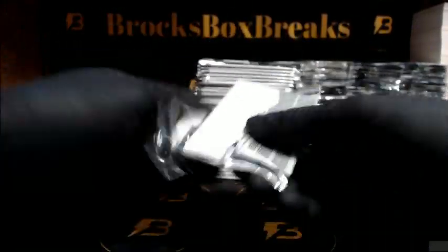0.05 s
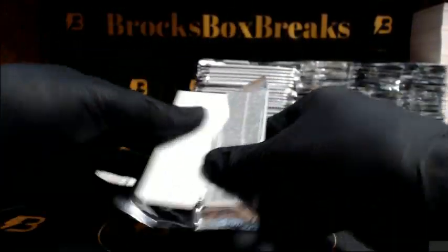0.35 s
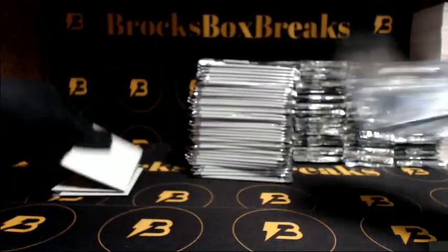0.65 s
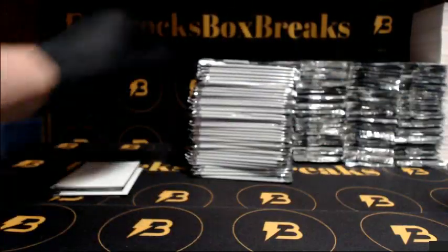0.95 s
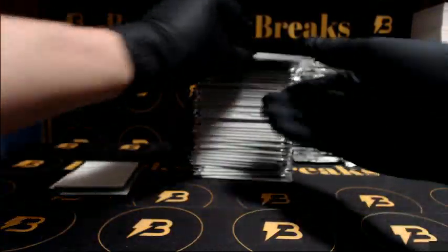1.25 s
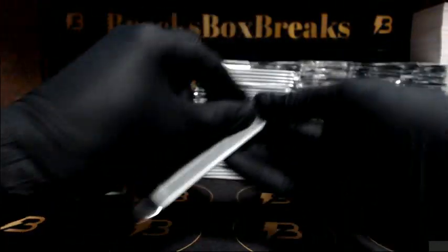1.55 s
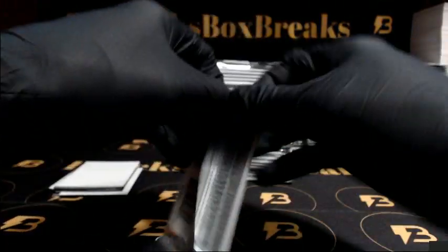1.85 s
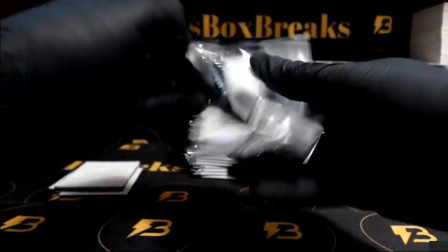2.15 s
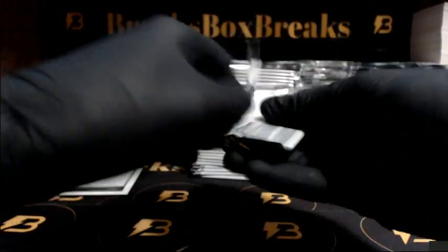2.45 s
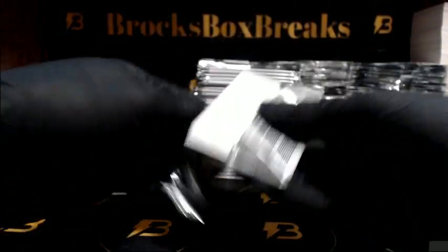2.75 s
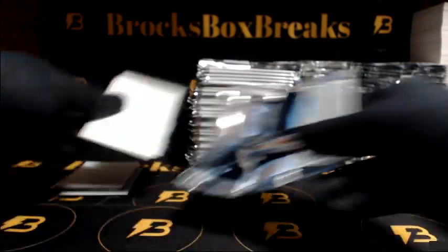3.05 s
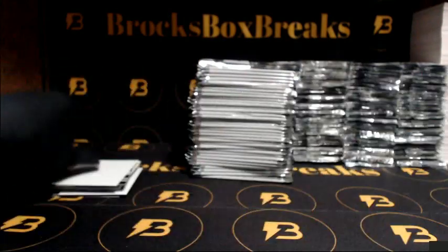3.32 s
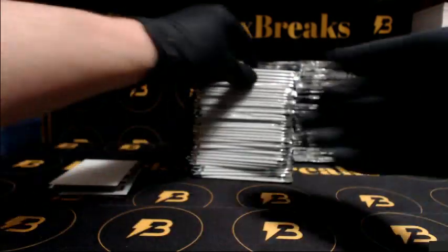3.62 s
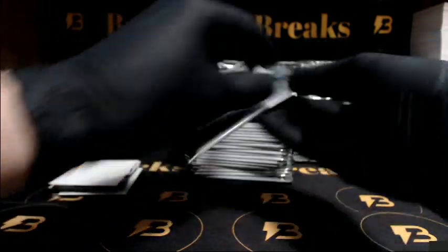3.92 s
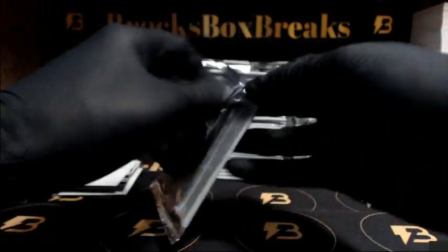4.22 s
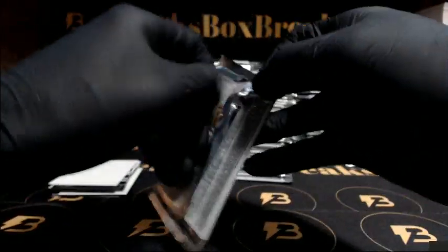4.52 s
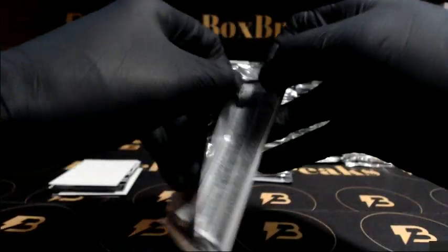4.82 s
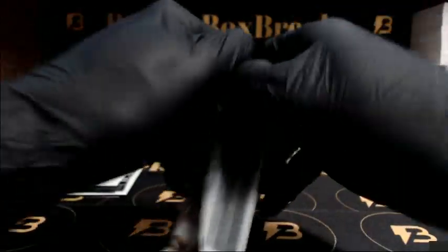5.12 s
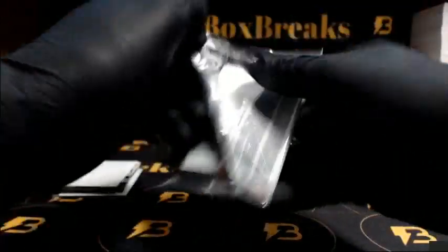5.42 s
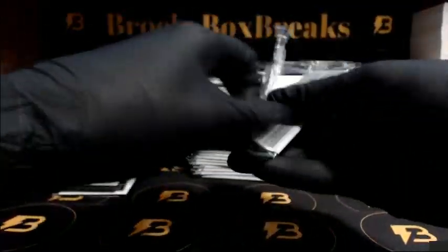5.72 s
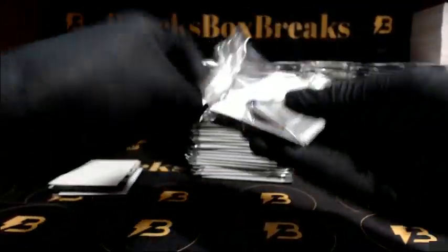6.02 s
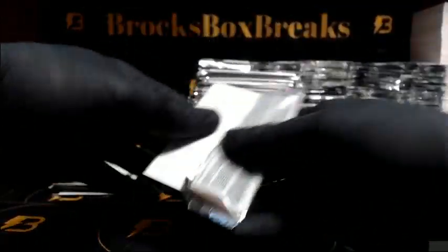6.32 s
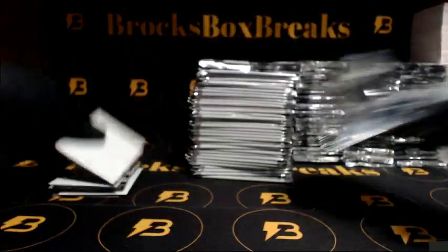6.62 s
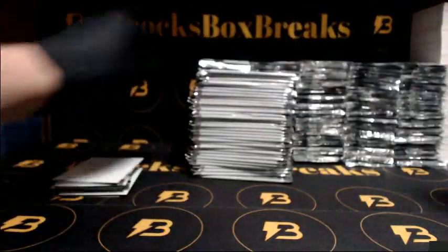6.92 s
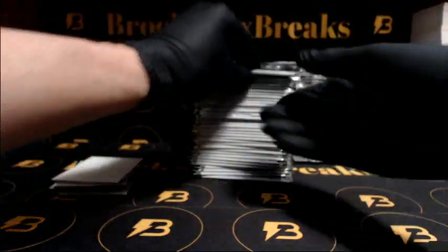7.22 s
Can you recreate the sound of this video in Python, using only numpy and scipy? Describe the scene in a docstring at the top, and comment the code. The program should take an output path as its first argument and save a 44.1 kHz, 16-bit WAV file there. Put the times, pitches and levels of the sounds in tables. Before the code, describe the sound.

In a small room, foil card packs are opened one after another right by the microphone. Bright crinkling and sharp snaps come in clusters, with two quick rips as the sealed seams give way. Three times the crackle eases and a stack of cards thumps softly onto a padded table. Light rustling starts again at the end, with a very faint hum and hiss underneath.

```python
"""Opening foil packs of trading cards

Gloved hands tear open foil packs, close to a microphone in a small room. Every squeeze, pull and rip
makes tiny patches of foil flip (the crinkle), while bigger creases give single, louder snaps.
Each stack of cards is then dropped on a padded table, which thumps.
The handling shakes the microphone stand, over faint hum and hiss."""
import sys
import numpy as np
from scipy import signal
from scipy.fft import rfft, irfft, next_fast_len
from scipy.io import wavfile
from scipy.ndimage import uniform_filter1d

SR = 44100
rng = np.random.default_rng(int(sys.argv[2]) if len(sys.argv) > 2 else 0)


def bounce(signal):
    """Save signal as a 16-bit WAV file at the path given by the first command-line argument."""
    frames = np.transpose(np.atleast_2d(signal))
    limited = np.clip(frames, -1, 1)
    pcm = np.round(limited * 32767).astype(np.int16)
    wavfile.write(sys.argv[1], SR, pcm)


N = 328986

# Levels compare rows within a table. A t60 is the time a sound takes to fade by 60 dB.
# how hard the microphone stand shakes: time_s, level_db
STAND_SHAKE = [(0.0, -77.5), (1.76, -82), (1.89, -67.5), (3.84, -79.5), (4.67, -64.5), (4.92, -87),
               (5.17, -51), (5.42, -75), (5.75, -65), (6.1, -78), (7.46, -76.5)]
# the tone of the stand's rumble: frequency_hz, level_db
STAND_SPECTRUM = [(8, -14), (19, 4), (33, -17), (55, -21.5), (90, -24.5), (140, -38.5), (220, -55.5),
                  (600, -82)]
# a fan motor's hum beating against the mains hum: pitch_hz, level_db
HUM_TONES = [(57, -82), (60, -83), (119.5, -98.5)]
# the tone of the steady room noise: frequency_hz, level_db
HISS_SPECTRUM = [(30, -14.5), (60, -12), (130, -8), (200, -27), (450, -25), (1100, -39), (7000, -36),
                 (16000, -31.5)]
# the tone of the foil: frequency_hz, level_db
FOIL_SPECTRUM = [(100, -33.5), (180, -10.5), (260, -11), (340, -11.5), (600, -6.5), (1100, -4), (1600, -1),
                 (2400, -3), (3700, -1), (5600, -0.5), (9500, 0.5), (12000, -1.5), (14000, -5),
                 (16000, -11)]
# a held pack rustles softly: start_s, hold_s, level_db, brightness_db_per_octave
HELD_RUSTLES = [(0, 0.33, -67, -1.5), (.33, 0.43, -73, -2.5), (1.15, 0.14, -76.5, -3),
                (1.33, 0.81, -61.5, 1), (2.22, 0.45, -60, -2), (2.86, 0.24, -73, -2), (3.8, 1.7, -70.5, 1),
                (5.1, 1.22, -64.5, -3.5), (6.32, 0.31, -71, -2.5), (6.96, 0.44, -75.5, -0.5)]
# each squeeze, pull or slide of the wrapper: start_s, hold_s, level_db, brightness_db_per_octave
HAND_STROKES = [(.027, 0.041, -51.5, 0), (.21, .075, -54, -2), (.575, 0.06, -66.5, -5.5),
                (.80, 0.032, -63, -.5), (1.0, 0.12, -73, -2.5), (1.22, 0.043, -65.5, 2),
                (1.33, 0.075, -56, 2.5), (1.44, 0.029, -41.5, 2.5), (1.51, 0.017, -49, 2),
                (1.58, 0.024, -55, -1.5), (1.70, 0.06, -44.5, .5), (1.89, 0.071, -55.5, 2),
                (1.97, 0.057, -47.5, 0), (2.05, 0.065, -60.5, -0.5), (2.27, 0.14, -42.5, 0.5),
                (2.385, .03, -39.5, -2.5), (2.44, 0.21, -50, -1), (2.735, 0.025, -55, -0.5),
                (2.785, 0.07, -52, -1), (3.06, 0.027, -54.5, -4.5), (3.46, 0.28, -71, -1.5),
                (3.575, 0.049, -65.5, -0.5), (3.873, 0.0082, -49, 1.5), (3.916, 0.021, -43.5, 3),
                (4.068, 0.0081, -52.5, 1.5), (4.195, .03, -46, 0), (4.28, 0.03, -49, 1),
                (4.548, 0.057, -44.5, 1.5), (4.66, 0.019, -59, 0), (4.78, .14, -58.5, 2.5),
                (4.835, 0.011, -46.5, -1), (4.97, .05, -64.5, -1.5), (5.19, 0.064, -46, -0.5),
                (5.335, 0.073, -50, -0.5), (5.52, 0.13, -45, 0.5), (5.66, 0.11, -38.5, -0.15),
                (5.80, 0.087, -50.5, -1), (5.89, 0.03, -44.5, -1), (5.99, 0.13, -55, -0.5),
                (6.225, 0.042, -48, -1.5), (6.56, 0.037, -60.5, -3.5), (6.96, 0.029, -69, -3),
                (7.06, 0.074, -68, -4), (7.145, 0.027, -60.5, 1.5), (7.28, 0.006, -67, -2.5),
                (7.405, 0.053, -50, 1)]
# the sealed seam rips open: start_s, hold_s, level_db, brightness_db_per_octave
SEAM_RIPS = [(1.798, 0.086, -42, 0), (5.083, .08, -38.5, 0.06)]
# big creases snap (body is the lower part, sparkle the top): start_s, level_db, body_db, sparkle_db
CREASE_SNAPS = [(.0715, -47, 17, 13), (0.1142, -52, 2, 1), (0.1388, -47.5, 9, -3), (0.2123, -48.5, 15, 9),
                (0.2555, -43, 3, 12), (0.2709, -42, -0.5, 0), (0.461, -49.5, 0.5, -3),
                (0.658, -51.5, -4, -3), (0.7298, -45.5, -3.5, -3), (0.8158, -54, 5, 2), (1.162, -52, 6, -4),
                (1.315, -48, -10, 4), (1.392, -46, -11, -2), (1.4634, -37.5, -9, -3.5),
                (1.514, -43, 3.5, -4), (1.5267, -46, -13, 10), (1.571, -43, -8, 4.5),
                (1.651, -41.5, -2.5, 2.5), (1.6895, -43.5, 1.5, 6), (1.7989, -30, 4, 3),
                (1.8738, -31.5, 2, .5), (1.969, -36.5, -5.5, -0.5), (1.9932, -36, 9, 6.5),
                (2.067, -41, -18, 1), (2.101, -40, 2, 4), (2.118, -43, -2.5, -1), (2.1837, -54, 2, -9),
                (2.2297, -47, -3, -7), (2.252, -45, -9, 10), (2.2865, -36.5, -7, -1.5),
                (2.326, -35, -2, -2), (2.3334, -34.5, 2, 4), (2.3856, -35, 14, 5.5),
                (2.4012, -28.5, 6, 1.5), (2.409, -30.5, -5, -4.5), (2.44, -37.5, 1, 4),
                (2.4798, -41.5, 8, 3), (2.5234, -44, 7, 13), (2.574, -39, 3, 2), (2.586, -37, 7, 7),
                (2.6117, -37.5, 3.5, 1.5), (2.7981, -40.5, 6.5, 3), (3.0727, -43.5, -5, 5),
                (3.1507, -44, 10, 0.5), (3.593, -52.5, -2, -3), (3.708, -50, 8, 2), (3.8342, -54, 5, 11),
                (3.881, -41.5, 11.5, 7.5), (3.917, -31.5, -12, 9), (4.0373, -54.5, 1, 9),
                (4.0636, -48, -8, 18), (4.126, -51, 0.5, 3.5), (4.1616, -48, 8, 10), (4.209, -40.5, 10, 9),
                (4.236, -44, 6.5, 10), (4.2822, -44, 8, 2), (4.3268, -45, -6, 12), (4.397, -55, -19, -13),
                (4.4792, -53.5, 12.5, -1), (4.5633, -35.5, -20, -2.5), (4.841, -41, 6.5, 6.5),
                (4.8943, -44, -22.5, 2), (4.9613, -56.5, 0, -1), (4.9834, -46.5, 4.5, 6.5),
                (5.0129, -47.5, 4, -0.5), (5.0627, -50, 6, -2), (5.0833, -25.5, -15, 4.5),
                (5.1062, -44, -10, -5), (5.1459, -31, 3, 3), (5.1578, -32.5, 2.5, 2),
                (5.207, -40, -3, 11.5), (5.2429, -37, -4, -7), (5.3923, -38, -15.5, 1.5),
                (5.4366, -42.5, -10, -6.5), (5.4836, -44.5, 2.5, 3.5), (5.516, -44, 4, -5),
                (5.5287, -36.5, -3, -3), (5.5486, -41.5, 3.5, 2), (5.5756, -36.5, -5, 0),
                (5.6074, -34.5, -1, 6), (5.673, -35, -13, 13), (5.751, -28, 9.5, 7.5),
                (5.7725, -31, -2, -8), (5.8052, -38, 4.5, 2), (5.8407, -40, 4.5, -3),
                (5.894, -36.5, 1, 9.5), (6.0458, -39, 4, -4), (6.0898, -42.5, 0.5, -4.5),
                (6.1376, -37.5, 3, -2.5), (6.253, -42.5, 9.5, 7), (6.2964, -43.5, 2, 4),
                (6.3862, -51.5, 7, -4), (6.4952, -49.5, 2.5, -11), (6.5413, -55.5, -15, -5),
                (6.6929, -53.5, 4, -8.5), (6.824, -55, -6.5, -4.5), (6.888, -64.5, 1.5, -2),
                (6.9478, -51, 8, -4), (6.9576, -46.5, 9, -7), (7.0715, -45, 6.5, 0.5),
                (7.449, -39.5, -21, 2)]
# soft bumps on the table as the cards are lowered: start_s, level_db
CARD_TOUCHES = [(0.487, -59), (3.008, -51.5), (6.472, -62)]
# a stack of cards lands: start_s, level_db, hardness_db_per_octave
CARD_DROPS = [(0.6003, -36.5, 0.5), (3.0809, -36, -4.5), (6.572, -46, 1.5)]
# the notes of the table with the card pile on it: pitch_hz, level_db, t60_s
TABLE_NOTES = [(143, -6, 0.097), (175, -5.5, 0.067), (224.5, -1, 0.056), (276, -5.5, 0.026),
               (380, -7, 0.049), (500, -14, 0.065), (705, -10.5, 0.029), (1000, -14, 0.029)]
# tugs on the pack that jolt the table: start_s, level_db, pitch_hz
PACK_TUGS = [(4.567, -55.5, 104), (5.085, -49, 85), (5.094, -58.5, 131)]
# hollow pops of larger panels of wrapper and card: start_s, level_db, pitch_hz
PANEL_POPS = [(1.8345, -40, 2100), (1.875, -39.5, 4200), (1.899, -43, 1910), (2.348, -41, 2980),
              (2.4002, -38, 2480), (2.4052, -43, 2200), (2.612, -43, 1590), (3.033, -57.5, 1340),
              (3.7085, -50, 1750), (4.397, -54, 4000), (5.0866, -33, 4000), (5.087, -37.5, 1270),
              (5.187, -39.5, 765), (5.351, -45, 3200), (5.659, -39.5, 3090), (5.759, -41, 705),
              (5.7716, -33, 1630), (6.1378, -47.5, 1290), (6.4958, -49, 1370)]
# how long the room echoes: frequency_hz, t60_s
ROOM_DECAY = [(150, .3), (1500, 0.24), (6000, 0.16), (15000, 0.064)]
# peaks and dips in tone from the table top and back wall: centre_hz, width_hz, gain_db
SURFACE_BANDS = [(718, 31, -4), (810, 39, -4.5), (1097, 56, -2.5), (1630, 91, -0.5), (1874, 760, -3),
                 (2200, 82, 2.5), (2490, 130, 3), (2770, 290, -1)]

TOP_HZ = 16050  # upper edge of the treble
RIP_EVENNESS = 0.76  # a seam gives way in more even steps than loose foil does (0-1)
LIGHT_DB, LIGHT_RANGE_DB = -56, 16  # below this level, over this range, flipping gives way to sliding
LIGHT_SLIDE_DB, LIGHT_FLIP_DB = 2.2, -5  # change in each under the lightest touch
TOUCH_HARDNESS = -5  # dB per octave
SETTLE_S, SETTLE_DB, SETTLE_HARDNESS = 0.026, -13, -3  # a stack's far edge lands later, weaker, softer
SWAY_HZ, SWAY_T60_S, SWAY_DB = 55.2, 0.44, -64  # each drop sets the microphone stand swaying


def amp(db):
    """Turn decibels into a number to multiply by."""
    return 10 ** (np.asarray(db) / 20)


def along(points, hz):
    """Read between (frequency, value) points on a log frequency scale."""
    frequencies, values = np.transpose(points)
    return np.interp(np.log(hz + 1), np.log(frequencies + 1), values)


def curves(rows):
    """Stretch each column after the time to one value per sample."""
    times, *columns = np.transpose(rows)
    return [np.interp(np.arange(N) / SR, times, column) for column in columns]


def filtered(x, response):
    """Scale each frequency in x by response(hz)."""
    size = next_fast_len(N + SR // 2)
    return irfft(rfft(x, size) * response(np.fft.rfftfreq(size, 1 / SR)), size)[:N]


def noise(spectrum):
    """Noise with the given tone and an average power of 1."""
    x = filtered(rng.standard_normal(N), lambda hz: amp(along(spectrum, hz)))
    return x / np.sqrt(np.mean(x ** 2) + 1e-20)


def add(track, start_s, sound):
    """Mix a sound into the track."""
    rest = track[max(0, round(start_s * SR)):][:len(sound)]
    rest += sound[:len(rest)]


def causal(gain_db):
    """Turn a gain curve into a filter that rings only after a hit (minimum phase)."""
    cepstrum = irfft(np.log(amp(gain_db) + 1e-6))
    half = len(cepstrum) // 2
    cepstrum[1:half] *= 2
    cepstrum[half + 1:] = 0
    return np.exp(rfft(cepstrum))


def ping(t, hz, t60, attack_s):
    """A pure tone that starts softly and dies away."""
    return np.sin(2 * np.pi * hz * t) * amp(-60 * t / t60) * (1 - np.exp(-t / attack_s))


def background():
    """The shaken stand rumbles, fan and mains hum, and the room hisses."""
    shake_db, = curves(STAND_SHAKE)
    t = np.arange(N) / SR
    hum = sum(amp(db) * np.sqrt(2) * np.sin(2 * np.pi * (hz * t + rng.random())) for hz, db in HUM_TONES)
    rumble = amp(shake_db + 2.0) * noise(STAND_SPECTRUM)
    return rumble + hum + amp(-79.5) * noise(HISS_SPECTRUM)


def moves(rows, t, swell_s, fade_s, sag_db=2):
    """Hand moves swell, sag a little and fade. Gives their total power, and power times brightness."""
    start, hold, db, brightness = np.transpose(rows)[:, :, None]
    shape = np.exp(np.minimum(t - start, 0) / swell_s - np.maximum(t - start - hold, 0) / fade_s)
    progress = np.clip((t - start) / hold - .5, -.5, .5)
    power = (shape * amp(db - sag_db * progress)) ** 2
    return np.array([power.sum(0), (brightness * power).sum(0)])


def handling(still_db=-86.5):
    """All hand moves together: the foil's level in dB, its brightness and the share that is ripping."""
    t = np.arange(0, N, 32) / SR
    rips = moves(SEAM_RIPS, t, swell_s=0.00089, fade_s=0.013)
    strokes = moves(HAND_STROKES, t, swell_s=.009, fade_s=.022)
    held = moves(HELD_RUSTLES, t, swell_s=.01, fade_s=.024)
    power, bright_power = rips + strokes + held
    power = power + amp(still_db) ** 2  # the wrappers lying at rest
    return curves(np.column_stack([t, 10 * np.log10(power), bright_power / power, rips[0] / power]))


def buckle(body_db, sparkle_db, crack_t60, ring_t60, ring_db, pop, uneven_db, size=2048, count=26):
    """One patch of foil flips: a pop, a short crack and a ring with its own tone. Total energy is 1."""
    t, hz = np.arange(size) / SR, np.fft.rfftfreq(size, 1 / SR)
    flex = rng.standard_normal(size) * (amp(-60 * t / crack_t60) + amp(ring_db - 60 * t / ring_t60))
    flex[0] += pop * rng.choice([-1, 1])
    resonances = np.column_stack([np.geomspace(400, TOP_HZ, count), rng.standard_normal(count)])
    shape_db = along([(1900, body_db), (3000, 0.013), (6000, 0.0076), (8200, sparkle_db)], hz)
    tone_db = along(FOIL_SPECTRUM, hz) + shape_db + uneven_db * along(resonances, hz)
    wave = irfft(rfft(flex) * causal(tone_db))
    return wave / np.linalg.norm(wave)


def crinkle(base_rate=1300, crowding=.4, spread_db=5.4, slide_db=-8.0, patches=24):
    """Tiny patches flip at random, more often under harder handling, while foil and cards slide."""
    level_db, brightness, ripping = handling()
    flips = rng.random(N) < base_rate * amp(crowding * (level_db + 52)) / SR
    unevenness = 1.5 - RIP_EVENNESS * ripping
    size_db = spread_db * unevenness * np.minimum(rng.exponential(size=N), 4)
    sizes = flips * amp(size_db) * rng.choice([-1, 1], N)
    local_power = np.abs(uniform_filter1d(sizes ** 2, int(0.037 * SR)))
    sizes /= np.sqrt(local_power + 1e-4)  # the hand sets the power, however many patches flip
    patch = rng.integers(patches, size=N)
    lightness = np.clip((LIGHT_DB - level_db) / LIGHT_RANGE_DB, 0, 1)
    sizes *= amp(LIGHT_FLIP_DB * lightness)
    sheet = amp(level_db + slide_db + LIGHT_SLIDE_DB * lightness) * noise(FOIL_SPECTRUM)  # sliding
    for k in range(patches):
        ring = buckle(0, 0, crack_t60=.002, ring_t60=0.016, ring_db=-7, pop=3.4, uneven_db=4)
        sheet += signal.oaconvolve(amp(level_db - 3.5) * sizes * (patch == k), ring)[:N]
    # tight foil sounds brighter than slack foil
    hz, t, spectra = signal.stft(sheet, SR, nperseg=128)
    octaves = np.log2(np.clip(hz, 380, 12000) / 7000)[:, None]
    tilt_db = octaves * np.interp(t * SR, np.arange(N), brightness)
    return signal.istft(spectra * amp(tilt_db), SR, nperseg=128)[1][:N]


def stray_ticks(per_second=24):
    """Bent foil keeps relaxing in thin random ticks, heard in the quiet moments."""
    level_db = handling()[0]
    track = np.zeros(N)
    for start in np.flatnonzero(rng.random(N) < per_second / SR):
        db = min(level_db[start] + 8, -58) + rng.normal(0, 2.5)  # follows the handling, up to a limit
        tick = buckle(0, 0, crack_t60=.002, ring_t60=0.021, ring_db=-10, pop=4.2, uneven_db=5)
        add(track, start / SR, amp(db + 19.5) * tick)
    return track


def small_snaps(per_second=9, threshold_db=-66, scatter_db=2, tone_spread_db=4):
    """While the foil is worked, small creases give way at random."""
    level_db = handling()[0]
    track = np.zeros(N)
    for start in np.flatnonzero((rng.random(N) < per_second / SR) & (level_db > threshold_db)):
        size, body, sparkle = rng.standard_normal(3)
        crease = buckle(tone_spread_db * body, tone_spread_db * sparkle,
                        crack_t60=.003, ring_t60=0.026, ring_db=-2.5, pop=3.4, uneven_db=3.5)
        db = min(level_db[start] + 5, -47) + scatter_db * size
        add(track, start / SR, amp(db + 22) * crease)
    return track


def big_snaps():
    """Large creases give way one at a time."""
    track = np.zeros(N)
    for start_s, db, body_db, sparkle_db in CREASE_SNAPS:
        crease = buckle(body_db - 1, sparkle_db + .5,
                        crack_t60=0.0034, ring_t60=0.032, ring_db=0, pop=5.4, uneven_db=1.8)
        add(track, start_s, amp(db + 21.5) * crease)
    return track


def landings():
    """Each stack touches, lands and settles. One row a contact: start_s, level_db, hardness."""
    touches = [(start_s, db, TOUCH_HARDNESS) for start_s, db in CARD_TOUCHES]
    settles = [(start_s + SETTLE_S, db + SETTLE_DB, hardness + SETTLE_HARDNESS)
               for start_s, db, hardness in CARD_DROPS]
    return touches + list(CARD_DROPS) + settles


def table_thumps():
    """Soft landings ring the table's low notes, hard ones the higher too; a tug gives one dull jolt."""
    track, t = np.zeros(N), np.arange(SR // 4) / SR
    for start_s, db, hardness in landings():
        for hz, note_db, t60 in TABLE_NOTES:
            strength = amp(db + 7.5 + note_db + hardness * np.log2(hz / 140) + rng.normal(0, 0.18))
            pitch_hz = hz * (1 + rng.normal(0, 0.042))
            add(track, start_s, -strength * ping(t, pitch_hz, t60, attack_s=0.0038))
    bass_cut = signal.butter(3, 92, "high", fs=SR, output="sos")  # the thumps carry no deep bass
    track = signal.sosfilt(bass_cut, track)
    stand_sway = amp(SWAY_DB) * ping(np.arange(SR) / SR, SWAY_HZ, SWAY_T60_S, attack_s=0.013)
    for start_s, *_ in CARD_DROPS:
        add(track, start_s, stand_sway)
    for start_s, db, hz in PACK_TUGS:
        add(track, start_s, amp(db + 9.0) * ping(t, hz, t60=0.086, attack_s=0.0073))
    return track


def panel_pops():
    """A larger panel flips and rings briefly at its own pitch."""
    track, t = np.zeros(N), np.arange(SR // 20) / SR
    for start_s, db, hz in PANEL_POPS:
        add(track, start_s, amp(db + 6.5) * ping(t, hz, t60=0.018, attack_s=0.00048))
    return track


def room_echo(x, delay_s=.003, places=4, stay_s=.25):
    """A short, blurred echo. Several versions take turns, as if the hands were moving about."""
    echo = np.zeros(N)
    place = (np.arange(N) / SR / stay_s).astype(int) % places
    for k in range(places):
        hz, t, spectra = signal.stft(rng.standard_normal(SR // 3), SR, nperseg=256)
        fade = amp(-60 * t / along(ROOM_DECAY, hz)[:, None])
        tail = signal.istft(spectra * fade, SR, nperseg=256)[1]
        tail = np.pad(tail / np.linalg.norm(tail), (int(delay_s * SR), 0))
        echo += signal.oaconvolve(x * (place == k), tail)[:N]
    return echo


def close_surfaces(x, size=4096):
    """Sound bouncing off the table top and wall boosts some pitches and weakens others."""
    hz = np.fft.rfftfreq(size, 1 / SR)
    gain_db = sum(db / (1 + (2 * (hz - centre) / width) ** 2) for centre, width, db in SURFACE_BANDS)
    return signal.oaconvolve(x, irfft(causal(gain_db)))[:N]


def scene():
    """Foil and table in the room, as one channel."""
    creases = big_snaps() + small_snaps() + panel_pops() + stray_ticks()
    rustle = crinkle()
    table = table_thumps()
    echo = room_echo(amp(-14.0) * creases + amp(-15) * rustle + amp(-20.0) * table)
    return (close_surfaces(creases + rustle + table + echo) + background())[None]


def record(dry):
    """Cut off the treble steeply above TOP_HZ."""
    return np.array([filtered(x, lambda hz: 1 / np.sqrt(1 + (hz / TOP_HZ) ** 160)) for x in dry])


dry = scene()
out = record(dry)
bounce(out)
```